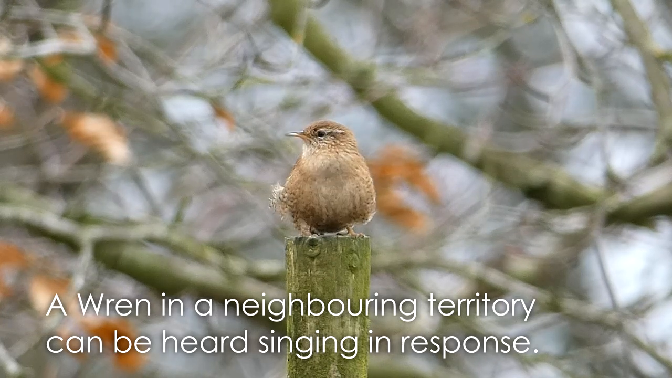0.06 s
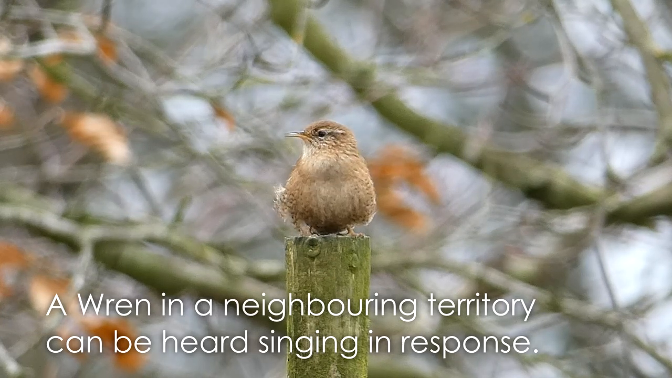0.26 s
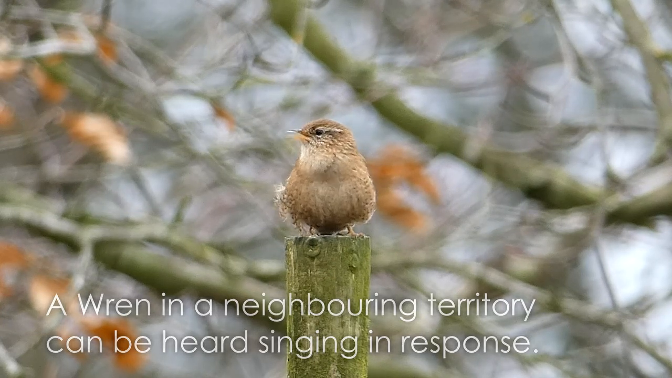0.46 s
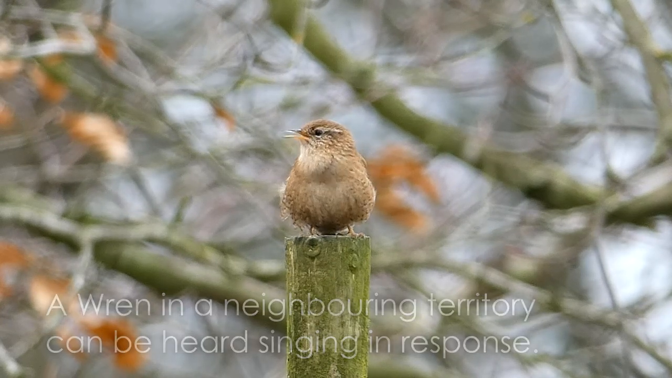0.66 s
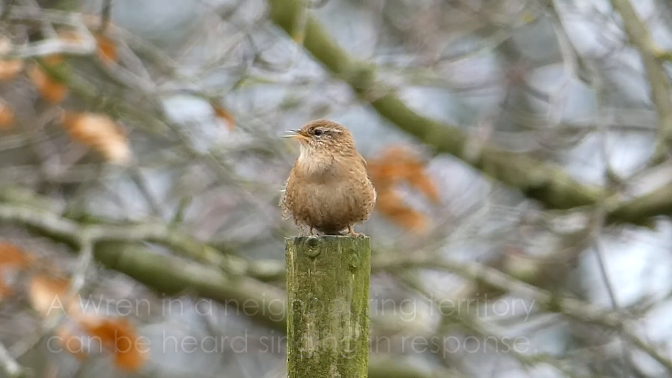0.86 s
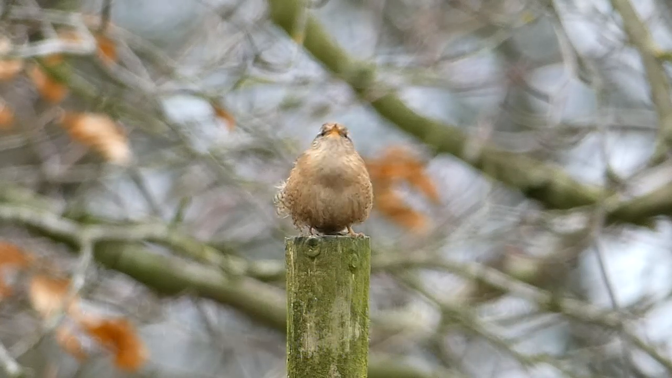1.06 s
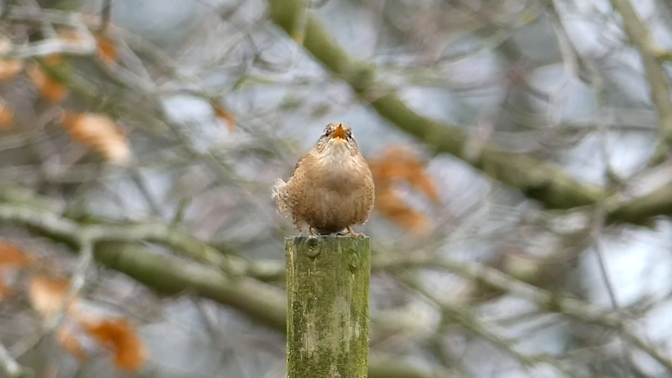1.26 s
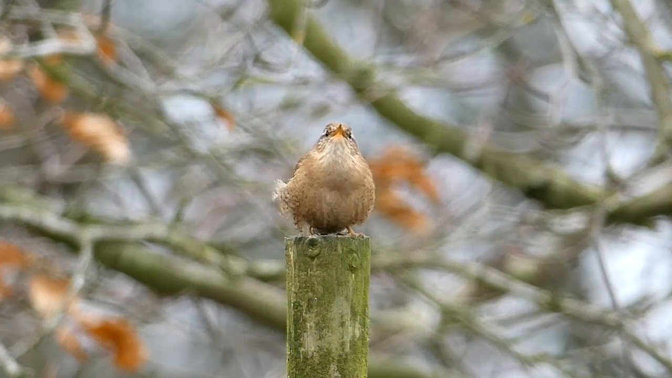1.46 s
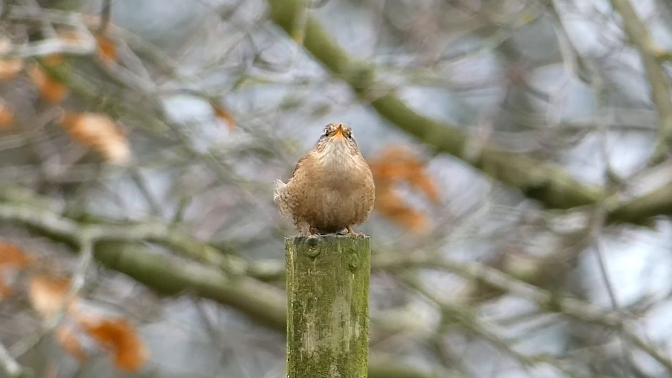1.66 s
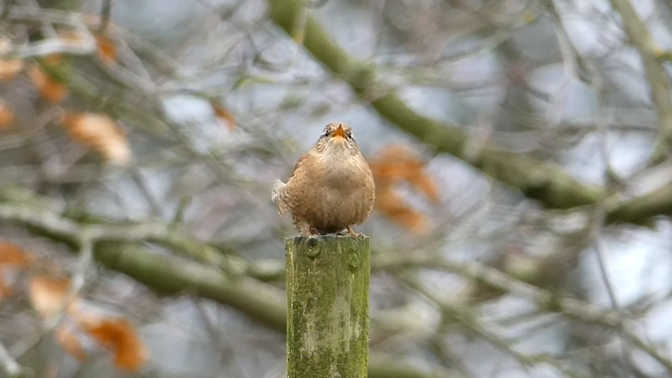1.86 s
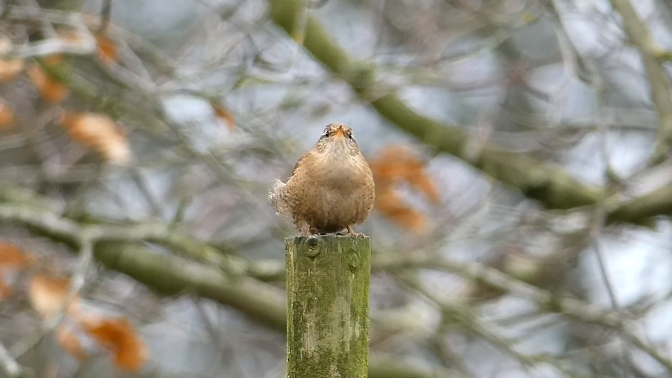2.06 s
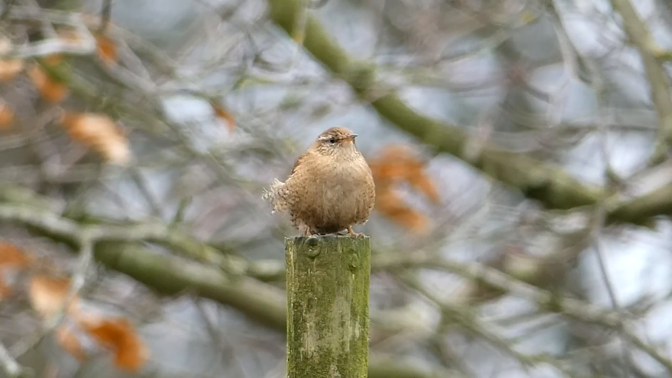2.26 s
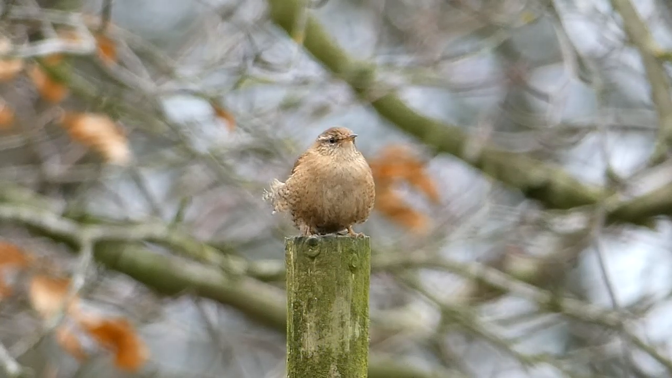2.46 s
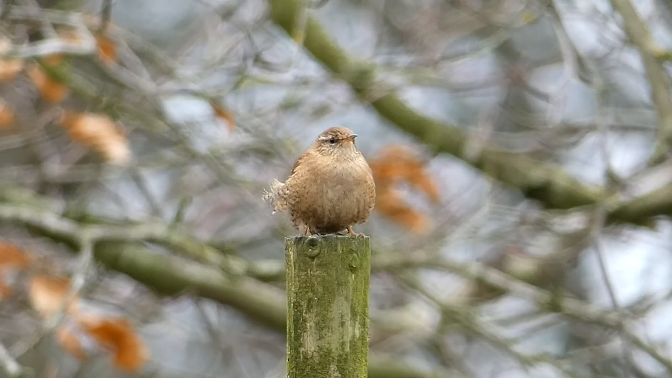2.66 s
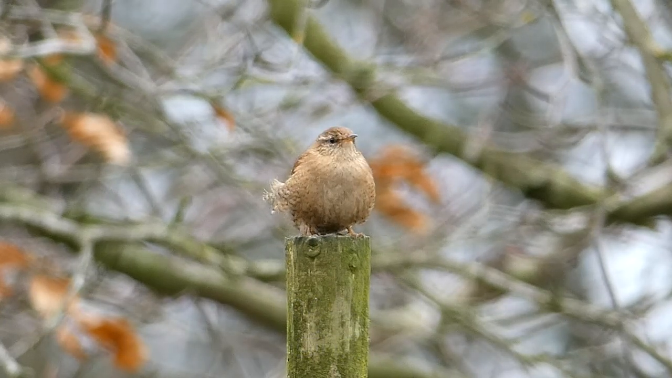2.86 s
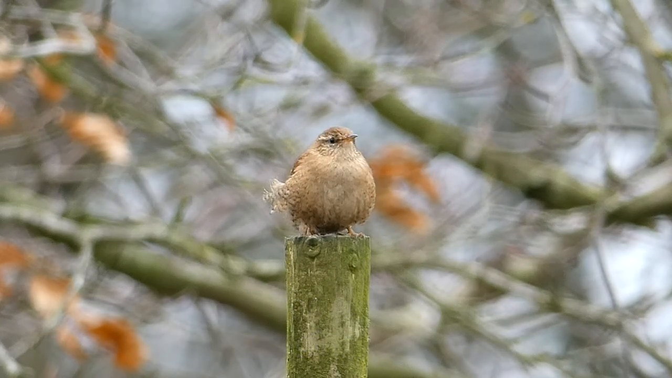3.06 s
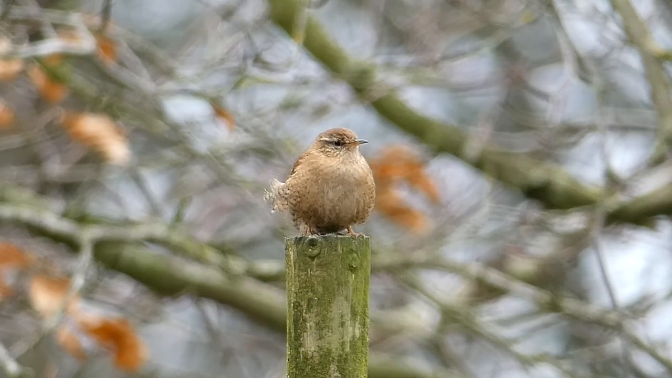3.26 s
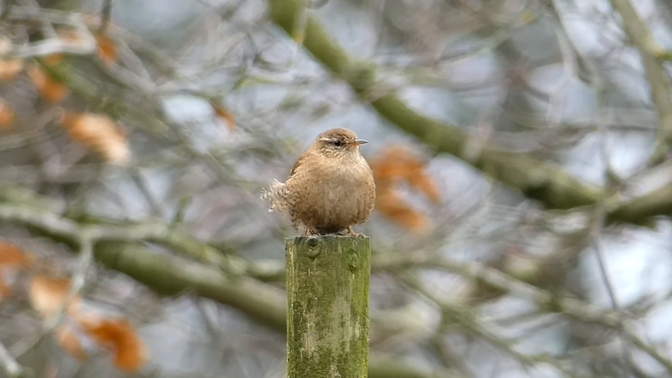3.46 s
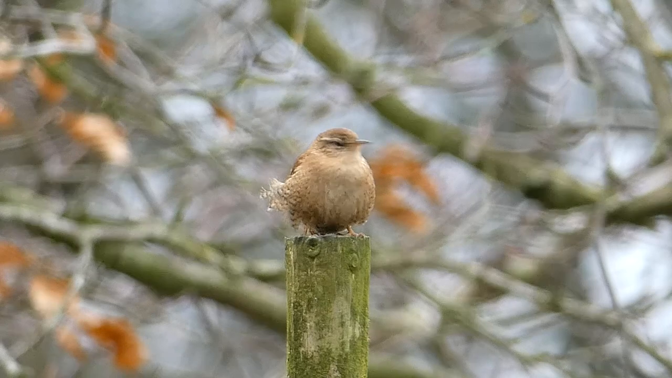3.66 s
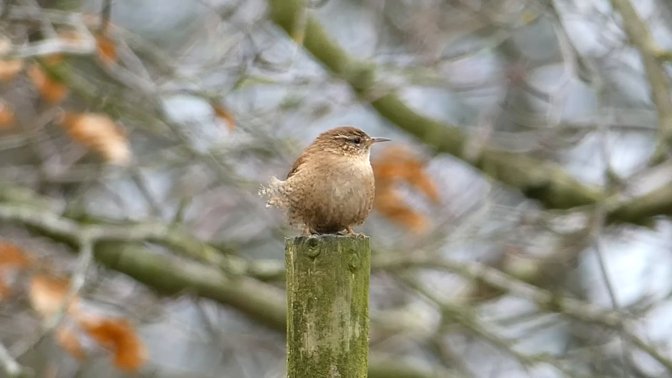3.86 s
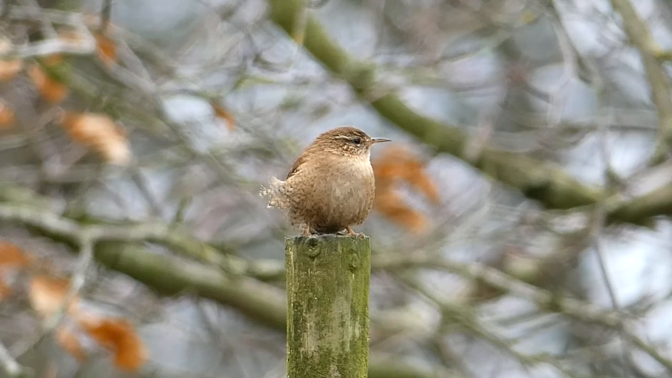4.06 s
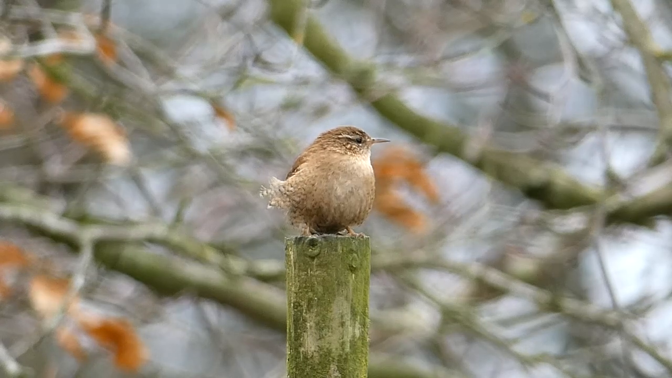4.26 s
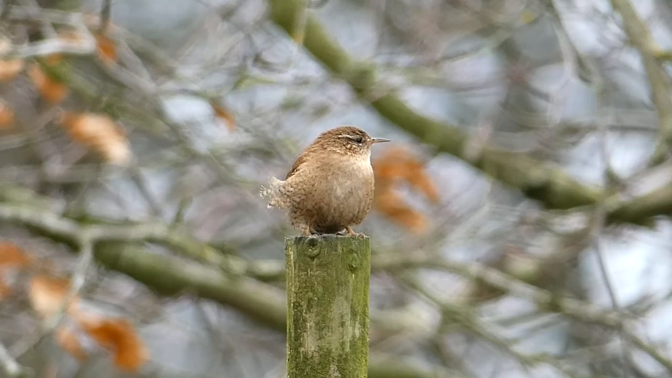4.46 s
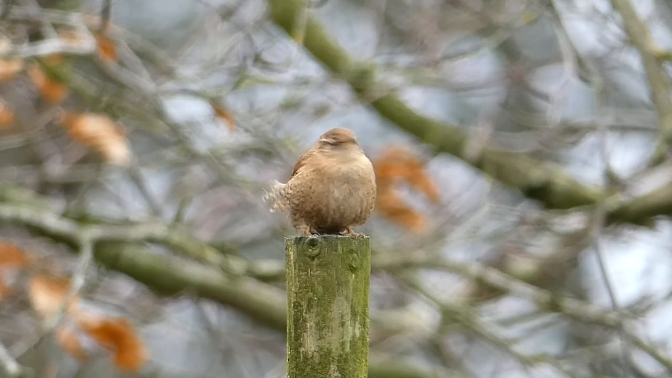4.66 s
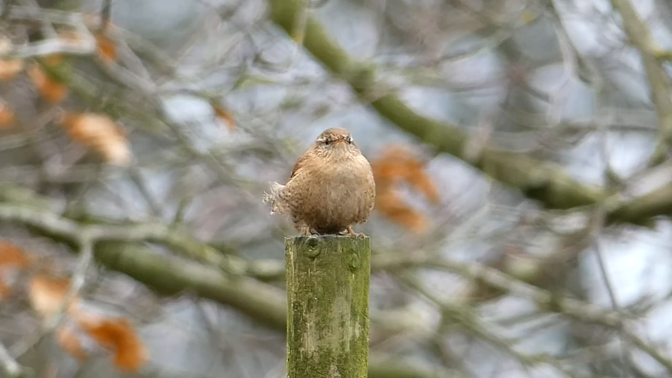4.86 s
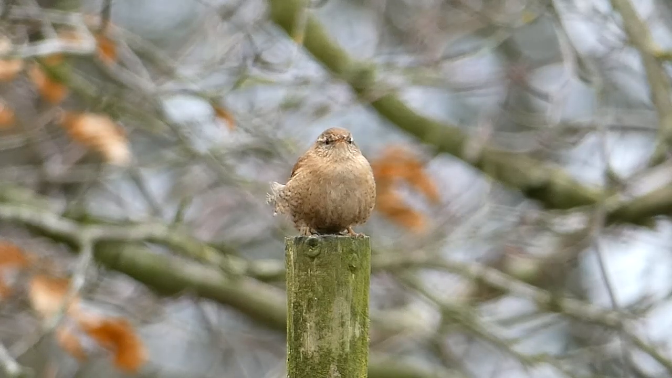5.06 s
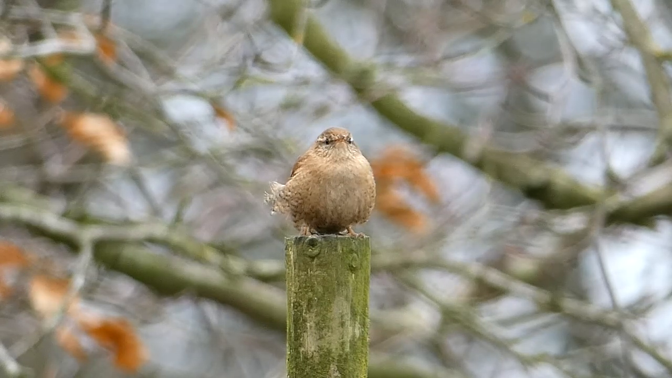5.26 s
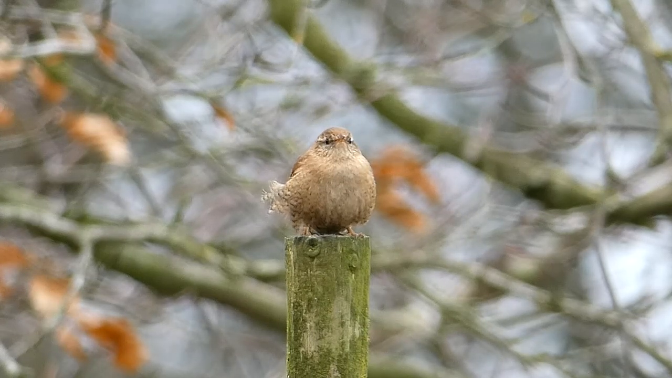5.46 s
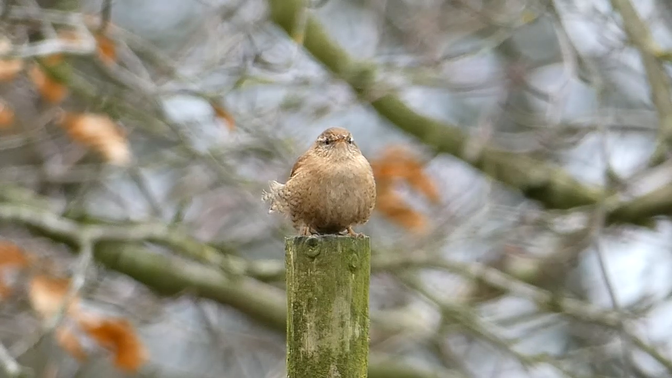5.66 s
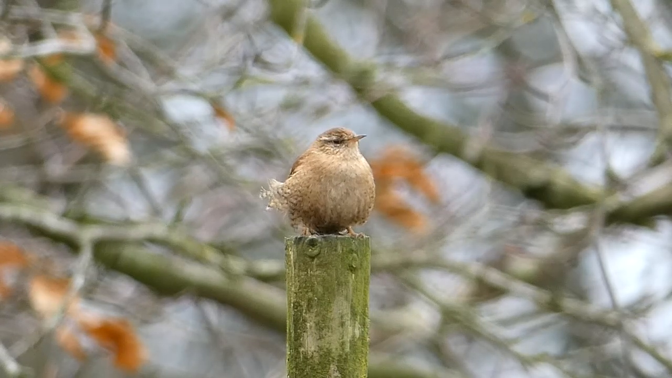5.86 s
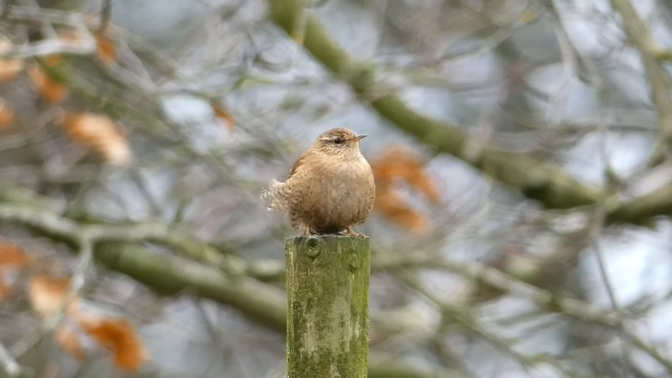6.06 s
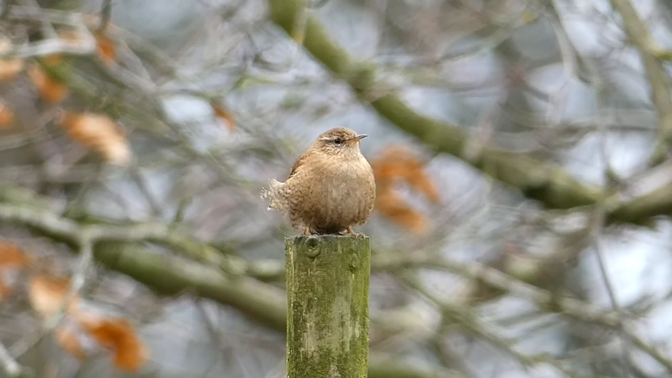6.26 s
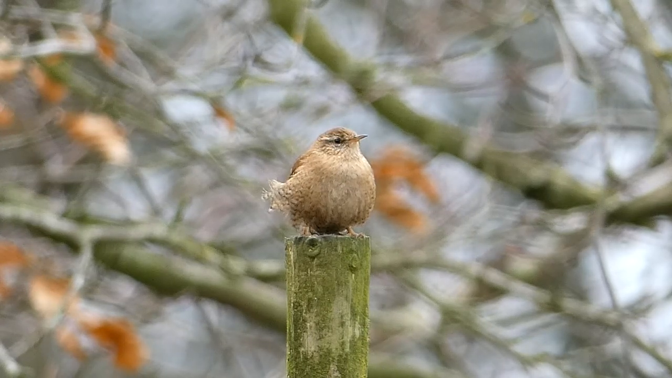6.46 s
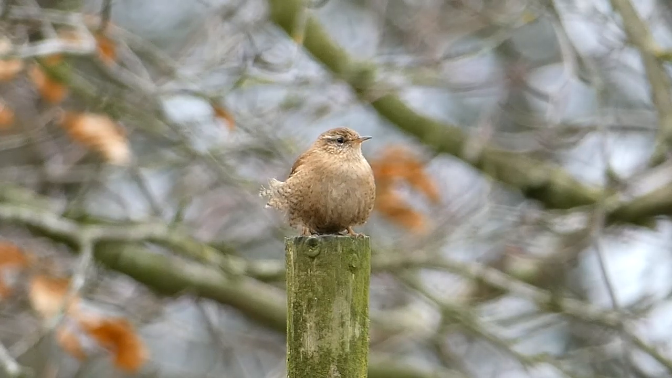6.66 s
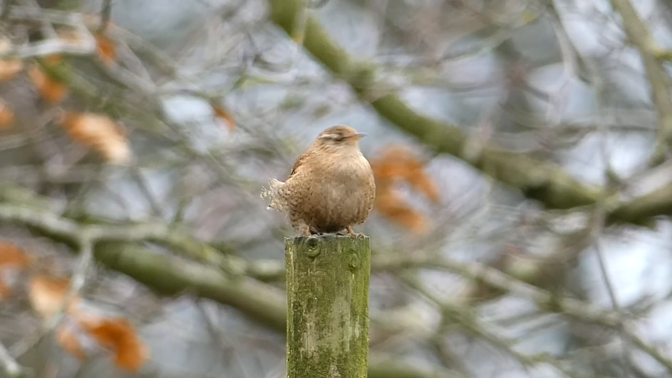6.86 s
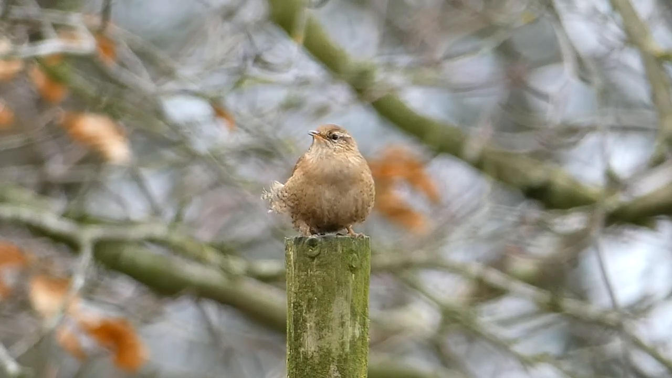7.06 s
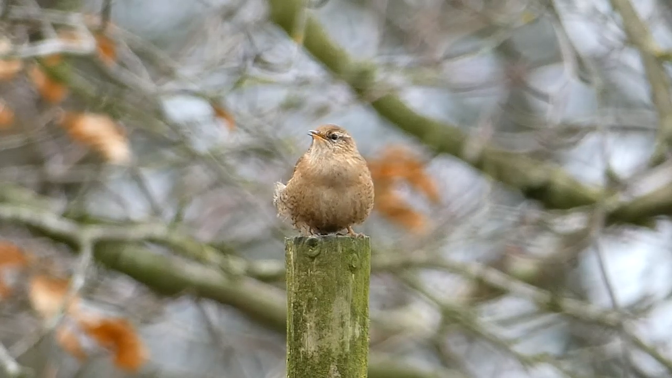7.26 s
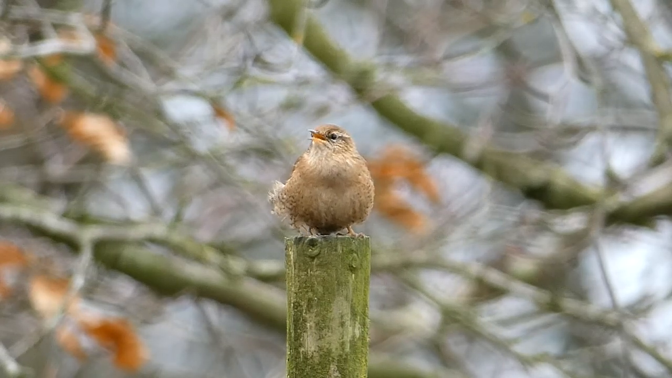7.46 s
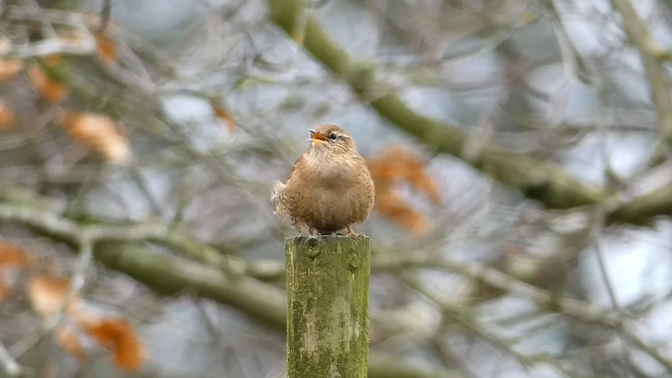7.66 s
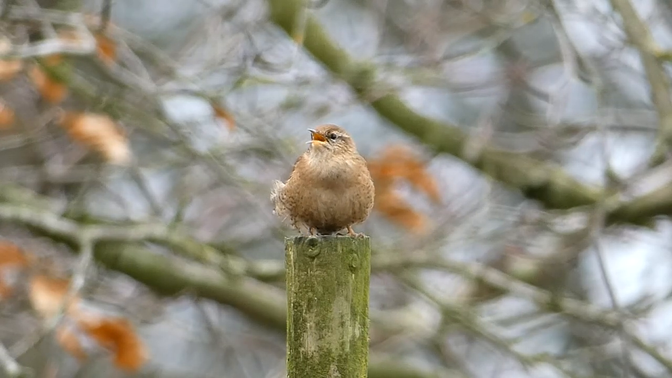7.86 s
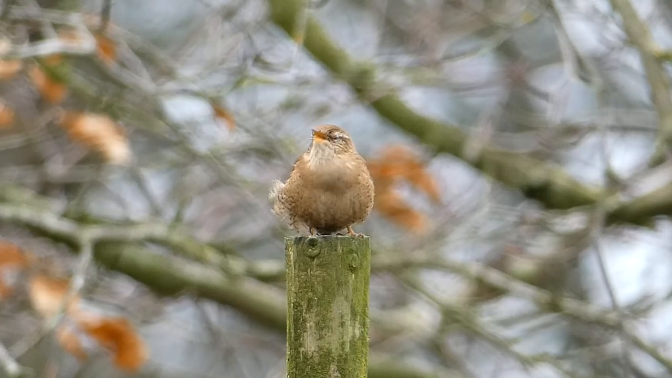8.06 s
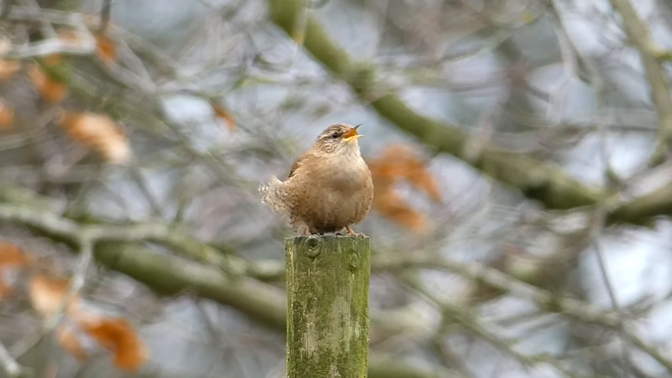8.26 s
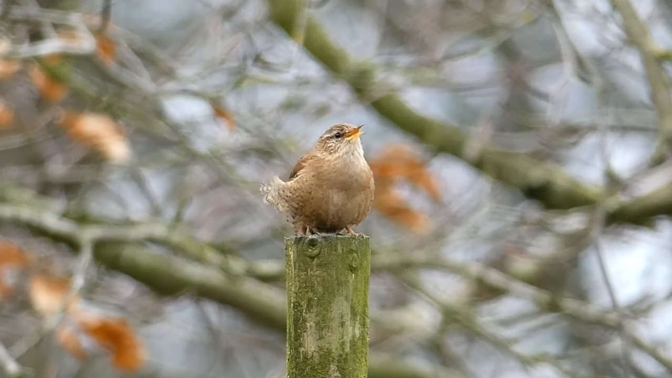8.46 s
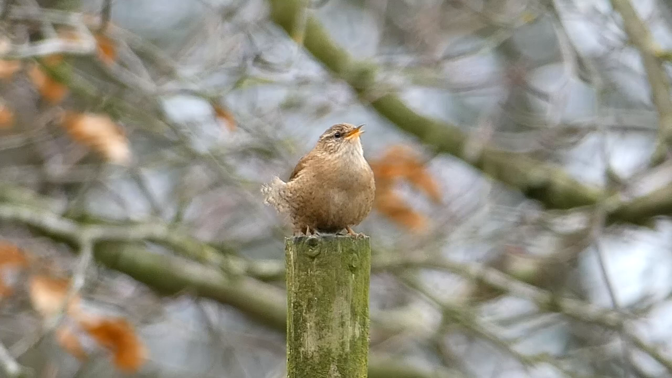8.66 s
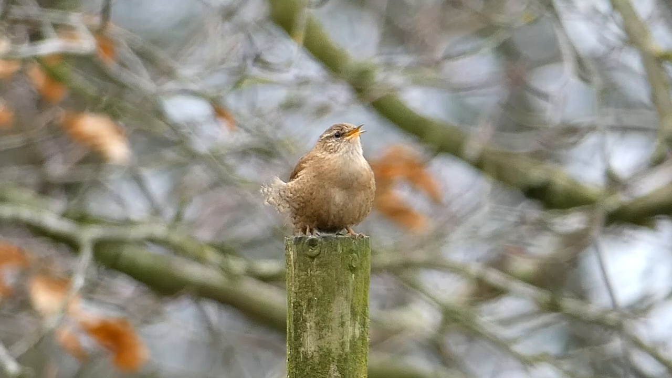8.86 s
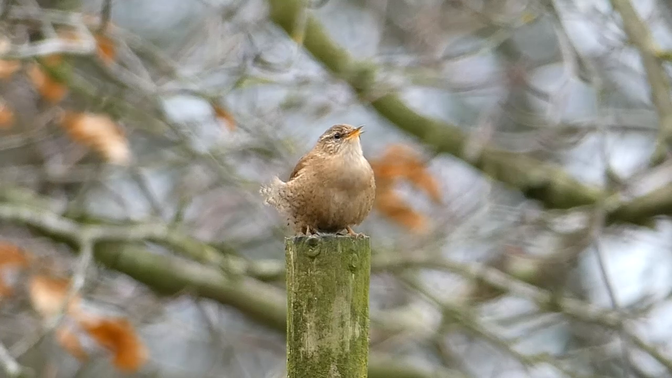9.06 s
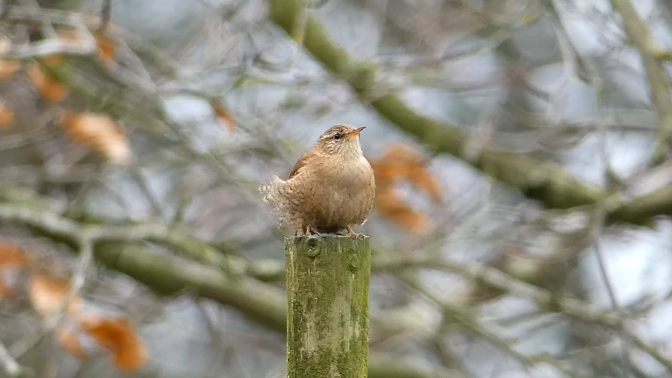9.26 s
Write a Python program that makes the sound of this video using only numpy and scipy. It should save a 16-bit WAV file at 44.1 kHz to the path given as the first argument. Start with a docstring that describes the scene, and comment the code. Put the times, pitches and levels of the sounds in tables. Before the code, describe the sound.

Small birds chirp over a soft woodland hush while a close wren whistles and trills, is answered from the right, then sings again.

```python
"""Over the steady hush of a wood, faint small birds chirp, each note a gliding, nearly pure tone.
A wren close to a stereo microphone sings a burst of whistles and a trill; a husky songbird sounds
deep in the wood, and a larger bird begins to rasp, its tone split into sidebands by a fast flutter.
Wrens further off to the right answer, three soft knocks fall, and the near wren sings a second burst.
Throughout, trunks and branches scatter every note into a soft reverberant tail."""
import sys
import numpy as np
from scipy import signal
from scipy.io import wavfile
from scipy.ndimage import uniform_filter1d

SR = 44100
rng = np.random.default_rng(int(sys.argv[2]) if len(sys.argv) > 2 else 0)


def output_pcm(signal):
    """Save a mono or channel-first signal as 16-bit PCM at the path in sys.argv[1].

    Samples are clipped to [-1, 1] before scaling.
    """
    pcm = np.clip(np.atleast_2d(signal).T, -1, 1) * 32767
    wavfile.write(sys.argv[1], SR, np.round(pcm).astype(np.int16))


N = 410571


def gain_of(db):
    """The decibel scale: 20 dB is a factor of ten in amplitude."""
    return 10 ** (np.asarray(db) / 20)


def unit_rms(x):
    """Normalisation to a mean power of one."""
    return x / np.sqrt(np.mean(x ** 2) + 1e-20)


def add(mix, start_s, sound, side_db):
    """Superposition with level panning: the sound joins the mix, side_db louder left than right."""
    left = gain_of(side_db)
    stereo = np.array([[left], [1]]) * 2 / (1 + left) * sound
    part = mix[:, round(start_s * SR):][:, :len(sound)]
    part += stereo[:, :part.shape[1]]


def hush(level_db=-67, patch_db=1.95):
    """Spectrally shaped noise, uncorrelated between channels, its level drifting in shared patches."""
    # spectrum of the wood's hush: frequency_hz, relative_density_db
    spectrum = [(25, -72), (80, -18.5), (200, -15), (350, -6.5), (900, -5), (1900, -11.5), (4000, -8),
                (6600, -13), (9900, -9.5), (14300, -21.5)]
    band_hz, band_db = np.transpose(spectrum)
    frames, hz = N // 256 + 5, np.fft.rfftfreq(1024, 1 / SR)
    left_re, left_im, right_re, right_im, patches = rng.standard_normal((frames, len(hz), 5)).T
    patches = uniform_filter1d(patches, size=10, axis=0)  # across frequency
    patches = unit_rms(uniform_filter1d(patches, size=24, axis=1))  # across time
    density_db = np.interp(np.log(hz + 1), np.log(band_hz), band_db)
    bins = np.array([left_re + 1j * left_im, right_re + 1j * right_im])
    bins *= gain_of(density_db[:, None] + patch_db * patches)
    noise = signal.istft(bins, nperseg=1024, noverlap=768)[1][:, :N]
    return gain_of(level_db) * unit_rms(noise)


def waver(t, low_hz, high_hz):
    """Beating: three sines of random rate and phase sum to an irregular swing."""
    return np.sin(2 * np.pi * (t * rng.uniform(low_hz, high_hz, (3, 1)) + rng.random((3, 1)))).sum(0)


def whistle(contour, flutter_db, octave_db, husk):
    """A gliding tone with a weak second harmonic; husk blurs it by random frequency modulation."""
    time_s, hz, db = np.transpose(contour)
    t = np.arange(0, time_s[-1], 1 / SR)
    pitch = np.interp(t, time_s, hz)
    for _ in range(2):  # round the corners of the glide
        pitch = uniform_filter1d(pitch, len(t) // 9 + 1, mode="nearest")
    pitch *= 1 + .006 * rng.standard_normal()
    pitch *= 1 + husk * uniform_filter1d(rng.standard_normal(len(t)), size=60)
    pitch *= 1 + .003 * waver(t, 12, 45)
    phase = 2 * np.pi * (np.cumsum(pitch) / SR + rng.random())
    envelope = gain_of(np.interp(t, time_s, db) + flutter_db * waver(t, 40, 120))
    fades = np.clip(np.minimum(t, t[-1] - t) / min(.004, .14 * t[-1]), 0, 1)
    octave_gain = gain_of(octave_db) * np.minimum(pitch / 6500, 1) ** 2
    return envelope * fades * (np.sin(phase) + octave_gain * np.sin(2 * phase)) * np.sqrt(2)


def song(notes, flutter_db, octave_db=-55, husk=0):
    """Superposition of whistles, each given as start_s, contour, side_db."""
    out = np.zeros((2, N))
    for start_s, contour, side_db in notes:
        add(out, start_s, whistle(contour, flutter_db, octave_db, husk), side_db)
    return out


def note(length_s, start_hz, turn_hz, end_hz, turn_s, db, end_db, onset_db, response=((0, 0),), scoop=0):
    """A frequency glide to a turn, then on to an end pitch, as a contour: time_s, pitch_hz, level_db."""
    t = np.linspace(0, length_s, 40)
    glide = np.minimum(t / turn_s, 1)
    after_turn_s = np.maximum(t - turn_s, 0)
    ending = 1 - np.exp(-after_turn_s / .022)
    if length_s - turn_s < .033:  # a short ending speeds up into a flick instead of settling
        glide = glide ** (.7 if turn_s > .04 else 1)  # a long glide eases off first
        ending = after_turn_s ** 1.4
    hz = start_hz + (turn_hz - start_hz) * glide + (end_hz - turn_hz) * ending / ending[-1]
    if start_hz > turn_hz and length_s > .1:  # scoop up into long falling notes
        hz *= 1 - scoop * np.exp(-t / .004)
    level_db = db + np.interp(t, [0, turn_s, length_s], [onset_db, 0, end_db])
    return np.transpose([t, hz, level_db + np.interp(hz, *np.transpose(response))])


def beat(first_s, last_s, count, ahead_s=0):
    """Nearly periodic onsets: a parabolic drift brings the middle of the run ahead_s early."""
    u = np.linspace(0, 1, count)
    return first_s + (last_s - first_s) * u - 4 * ahead_s * u * (1 - u)


def faint_birds():
    """Small birds among the trees: frequency sweeps, slightly blurred, each from its own side."""
    # chirps: start_s, length_s, start_hz, turn_hz, end_hz, turn_s, level_db, end_gain_db, side_db
    chirps = [ (0.0, .055, 6200, 6180, 6150, .012, -58, -3.5, -17),
              (0.091, .206, 7400, 7000, 7370, .035, -57, 0.1, -5.5),
              (0.074, .25, 8400, 8050, 7850, .17, -62, -1.5, -3),
              (0.407, .192, 6150, 5880, 6050, .032, -52, -14, -7.5),
              (0.629, .2, 6110, 4750, 4150, .1, -47.5, -13, -6.5),
              (1.262, .055, 8180, 7500, 6820, .027, -61, .9, -12.5),
              (1.43, .085, 7800, 8000, 7100, .03, -59, -1.5, -8.5),
              (1.5555, .095, 4300, 3314, 2900, .028, -66.5, -13, -7),
              (1.638, .08, 1346, 1340, 1323, .015, -67.5, -3.4, 3),
              (2.1115, .06, 8500, 7650, 6300, .044, -55.5, -11, 1.9),
              (2.2235, .06, 8500, 7650, 6300, .044, -53.5, -11, 1.9),
              (2.2655, .035, 5100, 5360, 6800, .02, -53.5, -1.5, -7),
              (2.345, .06, 8500, 7650, 6300, .044, -51, -11, 1.9),
              (2.4375, .035, 5100, 5360, 6800, .02, -49, -1.5, -7),
              (2.479, .08, 6540, 6800, 6780, .038, -59, -2.1, 22),
              (2.612, .04, 6230, 5640, 6440, .023, -52.5, -4, -9.3),
              (2.664, .115, 6590, 7200, 6940, .053, -54, 1.5, -3),
              (2.839, .1, 6920, 7560, 6900, .009, -54, -4, -5),
              (2.9655, .06, 2025, 2195, 3070, .026, -65.5, -4, -15),
              (3.0, .13, 4910, 4880, 4300, .028, -51, 1.1, -4.5),
              (3.1545, .06, 2025, 2195, 3070, .026, -67.5, -4, -15),
              (3.395, .035, 7900, 7950, 7040, .012, -60, .6, -3),
              (3.481, .14, 3220, 4317, 4204, .014, -53, -4.5, -5.5),
              (3.5585, .035, 5100, 5360, 6800, .02, -59.5, -1.5, -7),
              (3.66, .18, 7500, 6350, 6150, .075, -57, -9.5, -6.5),
              (3.67, .18, 8000, 7400, 8000, .024, -58, -12, -2.1),
              (3.866, .192, 6050, 5874, 5940, .032, -47.5, -14, -7.5),
              (3.9755, .035, 5100, 5360, 6800, .02, -50, -1.5, -7),
              (4.12, .05, 5550, 5960, 5740, .011, -48.5, -8, -7),
              (4.644, .07, 3180, 3130, 2960, .049, -58, -9.5, -9.5),
              (4.789, .14, 8040, 6350, 7550, .023, -55, -3, -3.2),
              (4.798, .045, 7800, 8500, 7600, .015, -62, -4, -3),
              (5.13, .07, 3265, 3515, 3384, .014, -61, 1.1, -15.5),
              (6.31, .21, 7270, 7260, 6620, .024, -56, -.6, -16),
              (6.325, .12, 6800, 7850, 8050, .02, -63, -6, -5),
              (6.94, .11, 8100, 7000, 6150, .02, -56, -5, -1.5),
              (7.052, .028, 6200, 7000, 7900, .012, -56, -2.1, -1.5),
              (7.323, .206, 7500, 7000, 7370, .033, -54, 0.1, -5.5),
              (7.684, .192, 5880, 5874, 5940, .032, -51, -14, -7.5),
              (7.897, .14, 6250, 4550, 3900, .115, -46, -8, -6.5),
              (8.215, .055, 8180, 7500, 6820, .027, -59, .9, -12.5),
              (8.3545, .11, 8300, 7730, 6900, .064, -57, 0.1, -8.5),
              (8.5485, .11, 8300, 7730, 6900, .064, -58, 0.1, -8.5),
              (8.6845, .085, 4800, 3600, 2900, .028, -59, -13, -7),
              (8.855, .095, 6930, 6350, 6650, .035, -47.5, -5, -8), ]
    # brief trills: first_s, last_s, count
    trills = [dict(first_s=2.682, last_s=2.815, count=2), dict(first_s=3.322, last_s=3.415, count=4)]
    notes = [(start_s, note(*row, onset_db=-6), side_db) for start_s, *row, side_db in chirps]
    return song(notes, flutter_db=.7, husk=.03) + trill(trills, level_db=-64, side_db=-6)


def answering_wrens(side_db=-6.5):
    """Frequency sweeps off to the right: single notes and runs whose level follows pitch, and a trill."""
    # single notes: start_s, length_s, start_hz, turn_hz, end_hz, turn_s, level_db, end_gain_db
    singles = [ (0.0, .038, 3620, 4170, 5740, .012, -44, 0.1),
               (3.18, .114, 6900, 6670, 5070, .088, -44, -2.1),
               (3.88, .045, 5200, 4800, 4740, .02, -44, -12),
               (4.069, .07, 6120, 4400, 3720, .038, -43.5, -2.1),
               (4.239, .075, 4170, 3760, 3580, .026, -45, 4),
               (4.957, .133, 6700, 4950, 4775, .055, -45, 1.1),
               (5.04, .038, 5040, 5720, 6400, .019, -47, 3), (5.256, .206, 7650, 7100, 7150, .05, -42, 1.1),
               (5.458, .018, 7200, 6900, 5900, .006, -45, -8),
               (6.144, .087, 6040, 4700, 3670, .063, -47.5, 7), ]
    # repeated notes: (first_s, last_s, count, ahead_s), growth_db, (a note as above without start_s)
    runs = [ (dict(first_s=4.19, last_s=4.6415, count=4, ahead_s=-.001),
            -.6, (.107, 7500, 5600, 3505, .058, -42, 4)),
            (dict(first_s=5.155, last_s=5.895, count=8, ahead_s=-.002),
            1.5, (.047, 5840, 4454, 2985, .021, -44, 0.1)),
            (dict(first_s=6.462, last_s=7.2195, count=9, ahead_s=.0005),
            5.5, (.053, 5540, 3620, 6250, .022, -46.5, -3)),
            (dict(first_s=7.342, last_s=7.695, count=5, ahead_s=-.0005),
            2.5, (.025, 3830, 4775, 5720, .012, -47.5, -5)), ]
    # strength of the voice across its range: pitch_hz, gain_db
    response = [(3000, -22), (3600, -11), (4300, -3), (5500, 0), (6300, -5), (7300, -9)]
    # trill timing: first_s, last_s, count, ahead_s
    trills = [dict(first_s=5.508, last_s=6.2885, count=24, ahead_s=.002)]
    voice = dict(onset_db=-5, response=response, scoop=.2)
    notes = [(start_s, note(*row, **voice), side_db) for start_s, *row in singles]
    for timing, growth_db, row in runs:
        onsets = beat(**timing)
        for start_s, gain_db in zip(onsets, np.linspace(0, growth_db, len(onsets))):
            varied = np.multiply(row, 1 + .015 * rng.standard_normal(len(row)))
            notes.append((start_s, note(*varied, **voice) + [0, 0, gain_db], side_db))
    return song(notes, flutter_db=1.58, husk=.02) + trill(trills, level_db=-53.5, side_db=side_db)


def near_wren():
    """Two bursts of frequency-modulated whistles and trills, close enough to carry a weak octave."""
    # syllable contours by name: length_fraction, pitch_hz, gain_db
    syllables = { "low": [(0, 4710, -2), (1, 4547, -4.5)], "lift": [(0, 5010, 2), (1, 5210, 2)],
                 "tick": [(0, 4700, 4), (1, 6900, 6)], "opening arch": [(0, 8220, -20), (.05, 7750, 1),
                 (.5, 8050, -2.5), (.74, 7660, 0), (1, 6490, 2.5)], "arch": [(0, 8900, -14), (.08, 7400, 1),
                 (.29, 7930, 0), (.7, 7810, 1), (1, 6840, 3.5)], "plunge": [(0, 4600, -14), (.1, 6500, 7.5),
                 (.57, 4340, 1), (1, 3310, -17.5)], "held": [(0, 6340, -5.5), (.15, 6540, -3),
                 (.34, 6173, 5.5), (.76, 6144, 0), (1, 6270, -4)], "dipping": [(0, 6540, -4),
                 (.38, 6080, 1.5), (.64, 6350, 4.5), (1, 6200, -5.5)], "climb": [(0, 6690, -.6),
                 (.16, 6980, 5), (.46, 6950, 3.5), (1, 7330, -3.5)], "quick climb": [(0, 6500, .6),
                 (.25, 7100, 6), (.4, 7000, 4), (1, 7250, -2.1)], "vee": [(0, 5350, 8), (.1, 5500, 12),
                 (.52, 3700, -1.1), (1, 5900, 2.1)], }
    # the song: start_s, length_s, level_db, syllable
    score = [ (0.1585, .03, -49, "low"), (0.2515, .035, -47, "lift"), (0.307, .018, -56, "tick"),
             (0.3925, .125, -48, "opening arch"), (0.558, .015, -57, "tick"), (0.579, .15, -44.5, "arch"),
             (0.773, .012, -54, "tick"), (0.793, .133, -43, "arch"), (0.975, .012, -57, "tick"),
             (0.9905, .133, -42, "arch"), (1.1715, .088, -38.5, "plunge"), (1.317, .101, -34.5, "held"),
             (1.947, .109, -40, "climb"), (2.101, .056, -45.5, "vee"), (7.1605, .03, -39.5, "low"),
             (7.2515, .035, -40.5, "lift"), (7.3105, .015, -51, "tick"), (7.386, .125, -50, "opening arch"),
             (7.55, .011, -53, "tick"), (7.5615, .136, -44, "arch"), (7.739, .011, -49.5, "tick"),
             (7.7605, .133, -41.5, "arch"), (7.935, .011, -49.5, "tick"), (7.955, .133, -43, "arch"),
             (8.134, .088, -37.5, "plunge"), (8.284, .117, -37.5, "dipping"),
             (8.979, .085, -45, "quick climb"), (9.1095, .054, -44.5, "vee"), (9.2095, .052, -50, "vee"), ]
    # trill timing: first_s, last_s, count, ahead_s
    trills = [dict(first_s=1.442, last_s=1.884, count=15, ahead_s=.0045),
              dict(first_s=8.4025, last_s=8.939, count=18, ahead_s=.0042)]
    notes = [(start_s, np.multiply(syllables[name], [length_s, 1, 1]) + [0, 0, level_db], -.48)
             for start_s, length_s, level_db, name in score]
    whistles = song(notes, flutter_db=1.26, octave_db=-30.5)
    return whistles + trill(trills, level_db=-43.5, side_db=.1, octave_db=-31.5)


def husky_songbird():
    """A bird deep in the wood: strong random frequency modulation widens each tone into a band."""
    # husky notes: start_s, length_s, start_hz, turn_hz, end_hz, turn_s, level_db, end_gain_db
    calls = [ (0.69, .11, 3630, 4070, 4080, .016, -61, 2.5),
             (0.7515, .2, 3200, 2945, 2900, .032, -66, -2.1),
             (1.041, .16, 2170, 3380, 3250, .042, -65, -1.8), ]
    # short straight glides: start_s, length_s, start_hz, end_hz, level_db
    glides = [(1.038, .11, 3740, 3640, -62), (2.37, .17, 4100, 4300, -72), (2.66, .09, 4050, 4450, -69),
              (2.8, .18, 4200, 4400, -70), (3.99, .16, 3100, 2650, -73), (6.075, .02, 2850, 2600, -68),
              (6.155, .025, 2900, 3450, -66), (6.325, .02, 2900, 3400, -66),
              (7.431, .19, 3530, 3710, -62.5), (7.756, .11, 4130, 4150, -57), (7.82, .08, 4750, 4700, -63),
              (8.52, .1, 3750, 3650, -62)]
    notes = [(start_s, note(*row, onset_db=-1.5), .8) for start_s, *row in calls]
    notes += [(start_s, [(0, start_hz, level_db), (length_s, end_hz, level_db)], -4)
              for start_s, length_s, start_hz, end_hz, level_db in glides]
    return song(notes, flutter_db=1.5, husk=.24)


def trill(timings, level_db, side_db, octave_db=-55):
    """A pulse train of steep downward sweeps, each varied in length, pitch, level and tilt."""
    # one flick of a trill: time_s, pitch_hz, gain_db
    flick = [(0, 7300, -8), (.004, 5150, 6.5), (.0052, 4500, 2.5), (.0066, 4300, -11)]
    time_s, hz, gain_db = np.transpose(flick)
    notes = []
    for start_s in np.concatenate([beat(**timing) for timing in timings]):
        stretch, detune, accent, tilt = rng.standard_normal(4)
        db = level_db + gain_db + 1.5 * accent + 2 * tilt * np.cos(np.pi * time_s / time_s[-1])
        contour = np.transpose([time_s * (1 + .08 * stretch), hz * (1 + .02 * detune), db])
        notes.append((start_s, contour, side_db))
    return song(notes, flutter_db=0, octave_db=octave_db)


def resonate(x, hz, width_hz):
    """Resonance by heterodyning: shift hz down to zero, low-pass, and shift back."""
    carrier = np.exp(2j * np.pi * np.cumsum(hz * np.ones(len(x))) / SR)
    pole = np.exp(-np.pi * width_hz / SR)
    return 2 * (carrier * signal.lfilter([1 - pole], [1, -pole], x / carrier)).real


def rasping_bird(flutter_hz=340):
    """A larger bird's tone jumps up and sags; fast modulation, deepest mid-call, adds sidebands."""
    # harsh calls: start_s, length_s, level_db
    calls = [(1.605, 0.053, -66.5), (1.925, 0.064, -63), (2.233, 0.07, -63), (2.785, .225, -61),
             (3.44, 0.21, -60), (6.455, .315, -61), (7.885, 0.315, -61.5)]
    out = np.zeros((2, N))
    for start_s, length_s, level_db in calls:
        u = np.linspace(0, 1, round(length_s * SR))
        wobble, jitter = uniform_filter1d(rng.standard_normal((2, len(u))), size=200, axis=1)
        arch_hz = 1850 + 640 * (1 - np.exp(-u * length_s / .035)) - 330 * u ** 2
        phase = 2 * np.pi * np.cumsum(arch_hz * (1 + .4 * wobble)) / SR
        flutter_phase = 2 * np.pi * np.cumsum(flutter_hz * (1 + 1.6 * jitter)) / SR
        depth = 1.05 * np.sin(np.pi * u ** .8)
        tone = np.sin(phase + depth * np.sin(flutter_phase)) * (1 + .4 * depth * np.cos(flutter_phase))
        tone += gain_of(-14) * np.sin(phase + 3 * flutter_phase)  # third upper sideband
        breath = resonate(rng.standard_normal(len(u)), arch_hz, width_hz=550)
        voice = unit_rms(unit_rms(tone) + gain_of(-8) * unit_rms(breath))
        add(out, start_s, gain_of(level_db) * voice * signal.windows.tukey(len(u), .42), side_db=-11)
    return out


def knocks(width_hz=330, attack_s=.006, t60_s=.2):
    """Dull thumps: noise in one broad resonance, with a soft attack and exponential decay."""
    # soft low knocks: start_s, level_db, resonance_hz
    thumps = [(4.8, -68, 600), (4.93, -64, 600), (5.005, -65, 392)]
    out, t = np.zeros((2, N)), np.arange(4000) / SR
    for start_s, level_db, hz in thumps:
        noise = rng.standard_normal(len(t))
        body = unit_rms(resonate(resonate(noise, hz, width_hz), hz, width_hz))
        envelope = (1 - np.exp(-t / attack_s)) * gain_of(level_db - 60 * t / t60_s)
        add(out, start_s, envelope * body, side_db=.1)
    return out


def trees(direct, branch_db, branch_t60_s, trunk_db, trunk_t60_s, correlation):
    """Multiple scattering: echoes of random sign die quickly off near branches, slowly off deep trunks."""
    delays = np.arange(90, SR - 20, 20) + rng.integers(0, 20, (2, (SR - 91) // 20))
    taps = np.zeros((2, SR))
    np.put_along_axis(taps, delays, rng.choice([-1., 1.], delays.shape), 1)
    taps[1] = correlation * taps[0] + np.sqrt(1 - correlation ** 2) * taps[1]
    t = np.arange(SR) / SR
    decays = []
    for db, t60_s in (branch_db, branch_t60_s), (trunk_db, trunk_t60_s):
        decay = gain_of(-60 * t / t60_s)
        decays.append(gain_of(db) * decay / np.linalg.norm(decay * taps[0]))
    highpass = signal.butter(2, 3600, "high", fs=SR)  # thin wood scatters short waves best
    echoes = signal.lfilter(*highpass, taps * np.hypot(*decays))
    return direct + signal.fftconvolve(direct, echoes, axes=1)[:, :N]


def scene():
    """Superposition at three depths: the further the bird, the stronger its tail against direct sound."""
    near = near_wren() + rasping_bird()
    far = answering_wrens() + faint_birds()
    deep = husky_songbird()
    near = trees(near, branch_db=-7, branch_t60_s=.041, trunk_db=-9, trunk_t60_s=.75, correlation=.86)
    far = trees(far, branch_db=-9.5, branch_t60_s=.063, trunk_db=-5, trunk_t60_s=.8, correlation=.88)
    deep = trees(deep, branch_db=-4, branch_t60_s=.11, trunk_db=1.5, trunk_t60_s=.85, correlation=.56)
    return near + far + deep + knocks() + hush()


def record(dry):
    """Band limiting: a linear-phase low-pass removes the highest treble."""
    cutoff_hz = 15700
    lowpass = signal.firwin(511, cutoff_hz, window=("kaiser", 9), fs=SR)
    return signal.oaconvolve(dry, lowpass[None], "same")


dry = scene()
out = record(dry)
output_pcm(out)
```